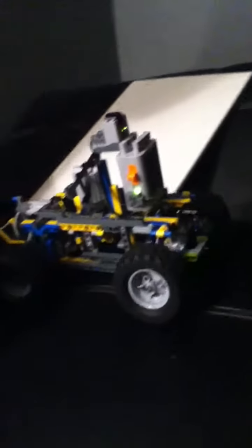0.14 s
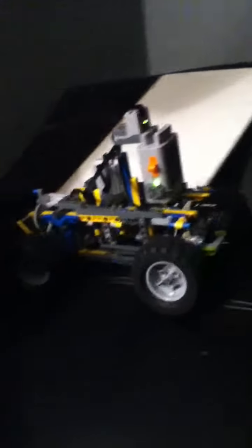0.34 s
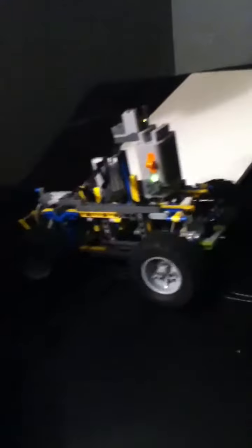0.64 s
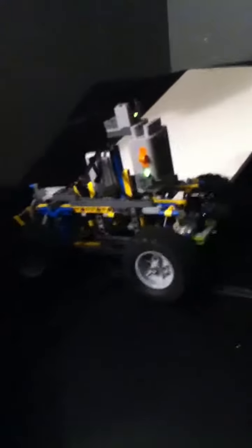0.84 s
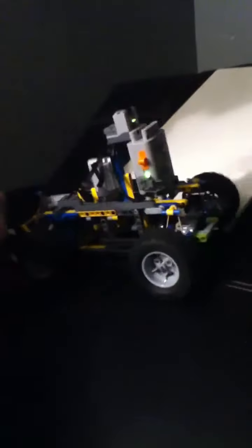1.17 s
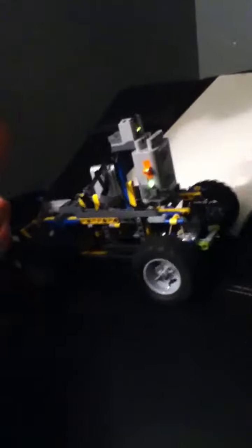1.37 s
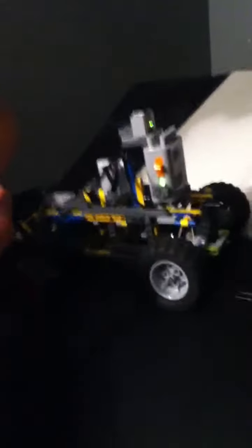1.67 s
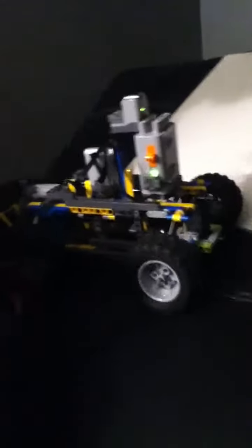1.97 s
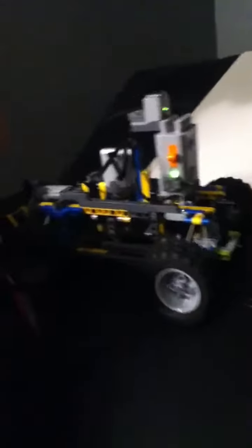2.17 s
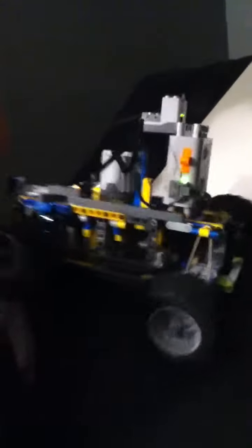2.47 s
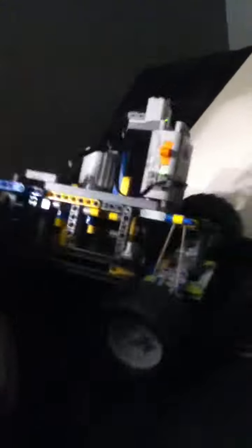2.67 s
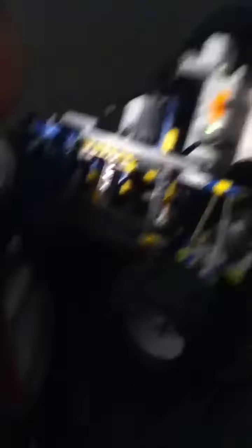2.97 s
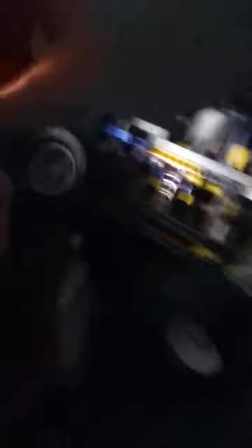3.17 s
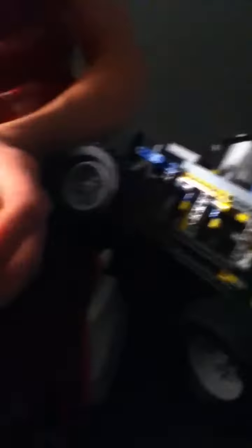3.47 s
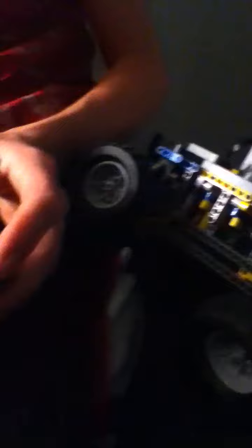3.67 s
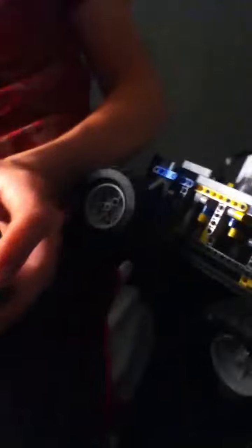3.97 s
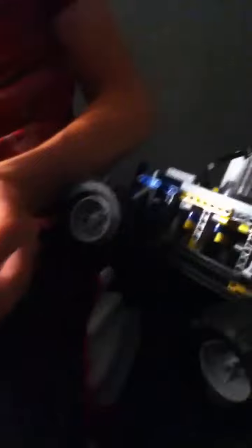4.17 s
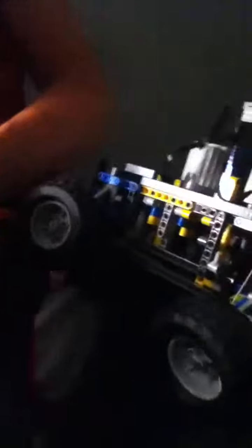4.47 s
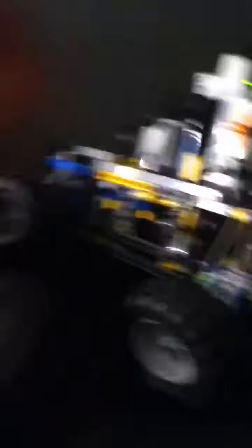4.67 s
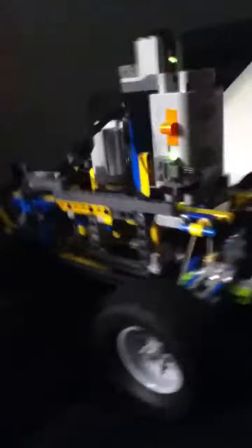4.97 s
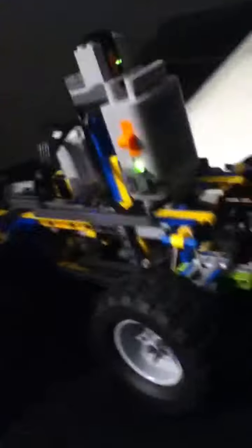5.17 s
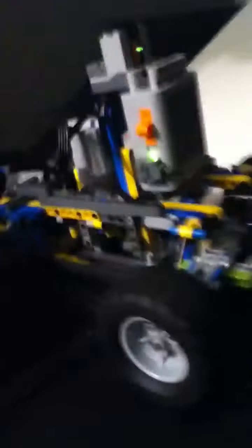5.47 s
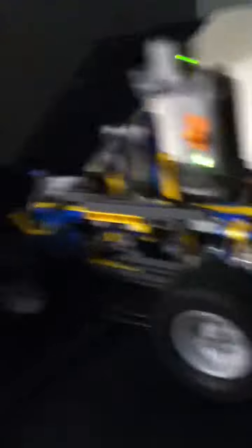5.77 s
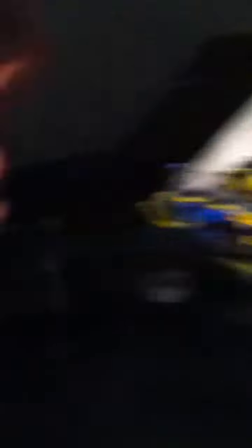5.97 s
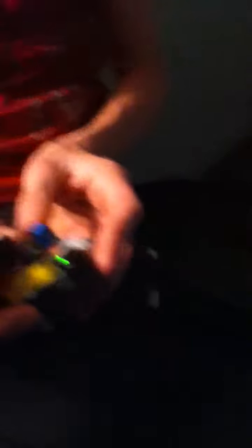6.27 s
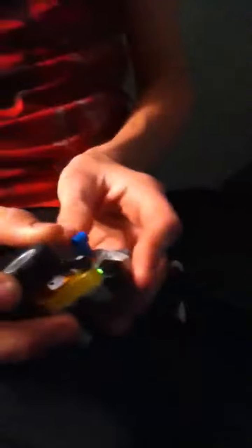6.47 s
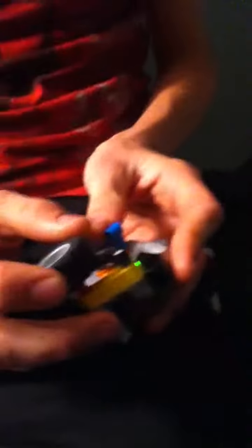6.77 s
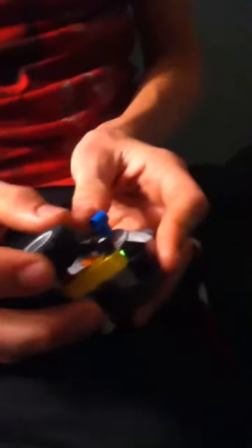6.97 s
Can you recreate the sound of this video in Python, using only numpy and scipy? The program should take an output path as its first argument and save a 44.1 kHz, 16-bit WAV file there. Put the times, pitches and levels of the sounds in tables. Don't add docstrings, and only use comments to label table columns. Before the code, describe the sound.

A small electric motor and plastic gears whirr and rattle in uneven bursts, stopping and restarting, with sharp plastic snaps in a quiet room.

```python
import sys
import numpy as np
from scipy import signal
from scipy.fft import rfft, irfft
from scipy.io import wavfile

SR = 44100
rng = np.random.default_rng(int(sys.argv[2]) if len(sys.argv) > 2 else 0)


def volts_from_decibels(level):
    exponent = np.asarray(level, float) / 20
    return 10 ** exponent


def dump_mix(stems):
    frames = np.atleast_2d(stems).T
    limited = np.clip(frames, -1, 1)
    pcm = np.round(limited * 32767).astype(np.int16)
    wavfile.write(sys.argv[1], SR, pcm)


N = 313992


def rms_one(x):
    return x / np.sqrt(np.mean(x ** 2) + 1e-20)


def in_time(rows):
    seconds, *columns = np.transpose(rows)
    return [np.interp(np.arange(N) / SR, seconds, column) for column in columns]


def drift(rate_hz):
    r = np.exp(-2 * np.pi * rate_hz / SR)
    wander = signal.lfilter([1], [1, -2 * r, r * r], rng.standard_normal(N + SR))
    return rms_one(wander[SR:])


def resonance(x, hz, width_hz):
    r = np.exp(-np.pi * width_hz / SR)
    poles = [1, -2 * r * np.cos(2 * np.pi * hz / SR), r * r]
    return signal.lfilter([(1 - r * r) / 2, 0, (r * r - 1) / 2], poles, x)


def swells(rows):
    t, swell_s = np.arange(N) / SR, 0.07
    gain = 0
    for start, end, db in rows:
        ramp = np.clip(np.minimum(t - start, end - t) / swell_s + 0.5, 0, 1)
        gain = gain + volts_from_decibels(db) * np.sin(np.pi / 2 * ramp) ** 2
    return gain


# time in seconds, teeth meshing per second in Hz.
SPEED = [
    [(.03, 1078), (.55, 1130), (.76, 1110), (.84, 1000), (.95, 930)],
    [(1.0, 907), (1.3, 1146), (1.5, 969), (1.62, 915)],
    [(1.92, 635), (2.0, 717), (2.1, 773), (2.4, 831), (2.5, 839), (2.6, 862), (2.8, 1008), (2.9, 967),
     (3.1, 913)],
    [(3.52, 810), (3.62, 845), (3.72, 910), (3.82, 948), (3.92, 922)],
    [(4.0, 965), (4.44, 1121), (4.69, 1005), (4.92, 992), (5.1, 1115), (5.21, 1146), (5.43, 1028),
     (5.76, 1030), (5.98, 1070)],
    [(6.09, 1058), (6.31, 1111), (6.54, 1116), (6.64, 1040), (6.72, 985), (6.86, 1020), (6.95, 1140),
     (7.1, 1090)],
]


def motor_speed():
    mesh_hz, = in_time(sum(SPEED, []))
    return mesh_hz


# on in seconds, off in seconds, spin-up in seconds, coast-down in dB per second, small gears in dB.
RUNS = [
    (-.3, 0.743, .05, 68, -0.5),
    (0.97, 1.611, 0.05, 270, 0),
    (1.885, 3.099, 0.081, 294, 2),
    (3.492, 3.84, 0.076, 152, 3),
    (3.96, 6.199, 0.019, 150, 0.5),
    (6.216, 6.682, 0.05, 200, -6),
    (6.724, 7.3, 0.029, 200, -3),
]
STILL_DB = -34


def running():
    t, drive, small = np.arange(N) / SR, volts_from_decibels(STILL_DB), 1e-9
    for on, off, spin_s, coast_db, small_db in RUNS:
        spin_up = 1 - np.exp(-np.maximum(t - on, 0) / spin_s)
        run = spin_up * volts_from_decibels(-coast_db * np.maximum(t - off, 0))
        drive = drive + run
        small = small + run * volts_from_decibels(small_db)
    return 20 * np.log10(drive), 20 * np.log10(small / drive + volts_from_decibels(STILL_DB))


def unevenness(teeth, mesh_hz):
    labour = np.clip((870 - mesh_hz) / 40, 0, 1)
    motor_db = 1.9 + 0.6 * labour
    gear_db = 1.2 + 1.9 * labour
    knock = np.exp(4 * (np.cos(2 * np.pi * teeth / 20 + 1.6 * drift(9)) - 1))
    motor_pulse_db = motor_db * np.cos(2 * np.pi * teeth / 8 + 0.4 * drift(5))
    gear_pulse_db = gear_db * knock * (1 + 0.7 * drift(20))
    return motor_pulse_db + gear_pulse_db + 0.51 * drift(28) + 0.31 * drift(260)


# from in seconds, to in seconds, level in dB.
SINGS = [
    [(.52, .72, -57), (1.06, 1.52, -58.5), (2.68, 3.04, -60.5), (4.06, 4.27, -57), (4.6, 6.2, -57.5),
     (6.76, 7.12, -63.5)],
    [(0, .68, -59), (1.3, 1.6, -55), (2.66, 3.0, -53), (4.65, 5.15, -50), (5.28, 6.14, -50.5),
     (6.4, 6.66, -56)],
    [(1.34, 1.56, -54.5), (2.3, 2.66, -48), (2.8, 3.06, -44), (3.56, 3.8, -48.5), (4.69, 4.93, -48),
     (5.17, 5.28, -62), (5.38, 5.85, -47.5), (6.9, 7.05, -49)],
    [(0, .5, -46.5), (1.39, 1.62, -43.5), (2.15, 3.04, -46), (4.7, 4.93, -48), (6.56, 6.74, -47)],
    [(.33, .77, -44.5), (1.27, 1.45, -50), (2.0, 2.6, -46.5), (5.17, 5.7, -55), (5.92, 6.04, -46)],
]
QUIET_MESH_DB = -69.5


def whine(teeth, force_db, drive_db):
    play = 0.7 * drift(28) + 0.15 * drift(200)
    play += 0.26 * np.sin(2 * np.pi * teeth / 8 + drift(4))
    turning = np.minimum(volts_from_decibels(1.5 * (drive_db + 14)), 1)
    tones = 0
    for k, rows in enumerate(SINGS, start=1):
        level = (swells(rows) + volts_from_decibels(QUIET_MESH_DB)) * volts_from_decibels(2.5 * drift(35))
        tones = tones + level * np.sin(2 * np.pi * k * teeth + np.sqrt(k) * play)
    return volts_from_decibels(4.5) * turning * rms_one(volts_from_decibels(0.38 * force_db)) * tones


# from in seconds, to in seconds, level in dB.
SECOND_PAIR = [
    (4.0, 4.42, -58.5),
    (4.55, 4.9, -57.5),
    (5.14, 6.2, -56.5),
]
# from in seconds, to in seconds, level in dB.
THIRD_PAIR = [
    (-.1, .15, -55.5),
    (.15, .48, -63),
    (4.17, 4.4, -58),
]


def slow_pair(teeth, flutter_db):
    second = np.sin(2 * np.pi * teeth * 0.6 + 0.8 * drift(20))
    second = swells(SECOND_PAIR) * volts_from_decibels(flutter_db * drift(25)) * second
    third = np.sin(2 * np.pi * teeth / 3 + 0.54 * drift(17))
    third = swells(THIRD_PAIR) * volts_from_decibels(flutter_db * drift(20)) * third
    return second + third


# time in seconds, nearness as rattle level in dB, motor side facing the listener in dB,
# wheel load on the chassis in dB.
POSE = [(0, -38, -5, 2), (.18, -40, -2, 2.5), (.31, -39, -5.5, 1), (.36, -39, 5, 2), (.72, -40, 1.5, 1),
        (1.08, -39, -2.5, 0), (1.36, -39, 2, -0.5), (1.5, -37, -3, -3), (2.03, -38.5, -5.5, -4),
        (3.05, -39, -0.5, 1), (3.75, -40, -2, 1.5), (4.0, -44, -3, 8.5), (4.7, -39, 2, 3.5),
        (6.16, -37, 1.5, 3), (6.29, -43.5, 3, 6), (6.66, -41.5, 5.5, -3), (6.86, -44.5, -2.5, 9.5),
        (6.95, -42.5, 9.5, 5)]
# level against nearness in dB, share of facing, share of load (both plain factors).
PARTS = [(-4.5, -0.054, 1.014), (-0.64, -0.25, .02), (-0.83, 0.43, -0.12), (-2, 0.73, 0.13)]


def heard_parts(drive_db, small_db):
    near_db, facing_db, load_db = in_time(POSE)
    levels = []
    for db, facing_share, load_share in PARTS:
        levels.append(drive_db + near_db + db + facing_share * facing_db + load_share * load_db)
    return levels[:-1] + [levels[-1] + small_db]


# pitch in Hz, width in Hz, level in dB.
CHASSIS = [(535, 320, -12.5), (1052, 260, -8), (1587, 456, -5), (2100, 470, -0.5), (2630, 430, -1.5),
           (3064, 280, -3.5), (7180, 560, -7)]
# pitch in Hz, width in Hz, level in dB.
BEAMS = [(3324, 560, -4.5), (3724, 357, 1.93), (3872, 295, 1.8), (4616, 590, -6.5)]
# pitch in Hz, width in Hz, level in dB.
HOUSING = [(5070, 370, -2), (5490, 440, 1.5), (6630, 1300, -5)]
# pitch in Hz, width in Hz, level in dB.
SMALL_GEARS = [(8180, 1070, -1.5), (9220, 1020, 2), (10950, 1030, -2), (12130, 3700, -12)]


def rattle(force_db, levels_db, per_s, spread_db, patchy_db):
    out = 0
    for part, level_db in zip((CHASSIS, BEAMS, HOUSING, SMALL_GEARS), levels_db):
        sizes = volts_from_decibels(spread_db * np.minimum(rng.exponential(1, N), 4.2)) * rng.choice([-1, 1], N)
        contacts = sizes * (rng.random(N) < per_s / SR) * volts_from_decibels(force_db)
        rings = 0
        for k, (hz, width_hz, db) in enumerate(part):
            ring = resonance(contacts, hz, width_hz)
            rings = rings + (-1) ** k * volts_from_decibels(db + patchy_db * drift(3.0)) * ring
        out = out + volts_from_decibels(level_db) * rms_one(rings)
    return out


# time in seconds, peak in dB, 1-2.5 kHz level in dB, 5-9 kHz level in dB, burst length in seconds.
SNAPS = [(2.7716, -15, -5.5, -7, 0.0012), (2.949, -11, -2, -17, 0.0023), (3.366, -27, -7, -1, 0.0011),
         (3.489, -44, -6, -3, .0012), (3.6557, -8, -17, -9, 0.00045), (3.658, -11.5, -10, 0, 0.0024),
         (3.815, -36, -12, 0.5, .0008), (3.968, -29.5, -15, -13, .0015), (6.0767, -2, -3.5, -11, 0.0012),
         (6.256, -30, -4, -8, 0.0015), (6.518, -20, -6, -4, 0.0025), (6.524, -23, -3, -5, .0008)]


def snaps():
    out, t = np.zeros(N + 2048), np.arange(2048) / SR
    band = signal.butter(2, [1100, 8500], "band", fs=SR, output="sos")
    for s, peak_db, low_db, high_db, length_s in SNAPS:
        burst = rng.standard_normal(2048) * np.exp(-t / max(length_s, 2e-4)) * 0.35
        burst[0] += 0.9
        middle = rms_one(resonance(burst, 4060, 500)) + 0.3 * rms_one(resonance(burst, 4060, 2500))
        low = resonance(burst, 2050, 330) + 0.28 * resonance(burst, 2700, 1300)
        high = resonance(burst, 6300, 1500)
        hit = middle + volts_from_decibels(low_db) * rms_one(low) + volts_from_decibels(high_db) * rms_one(high)
        hit = signal.sosfilt(band, hit)
        at = round(s * SR)
        out[at:at + 2048] += volts_from_decibels(peak_db) * hit / np.abs(hit).max()
    return out[:N]


# delay in seconds, level in dB.
ECHOES = [
    (.0017, -7),
    (.0043, -15),
    (.0127, -20),
    (.021, -24),
]


def walls(x):
    out, dull = x.copy(), signal.lfilter([0.6], [1, -0.4], x)
    for s, level_db in ECHOES:
        lag = round(s * SR)
        out[lag:] += volts_from_decibels(level_db) * dull[:-lag]
    return out


# time in seconds, peak in dB, pitch in Hz.
BUMPS = [
    (2.775, -37, 590),
    (3.039, -44, 268),
    (3.268, -35.5, 226),
    (4.35, -40, 456.4),
    (4.515, -35, 624),
    (4.592, -34.5, 607),
    (5.17, -36, 696),
    (5.431, -48, 200),
]


def bumps():
    out, t = np.zeros(N + 2048), np.arange(2048) / SR
    for s, peak_db, hz in BUMPS:
        at = round(s * SR)
        cycles = hz * (t + 0.0011 * (1 - np.exp(-t / 0.0002)))
        thud = np.sin(2 * np.pi * cycles) * np.exp(-t / 0.0025)
        out[at:at + 2048] -= volts_from_decibels(peak_db + 3.5) * thud
    return out[:N]


# from in seconds, to in seconds, level in dB.
DRAG = [
    (.53, .67, -52),
]


def drag():
    white = rng.standard_normal(N)
    rumble = resonance(white, 153, 40) + 0.65 * resonance(white, 230, 50) + 0.18 * resonance(white, 310, 90)
    return swells(DRAG) * rms_one(rumble)


def coloured(spectrum):
    hz, level_db = np.transpose(spectrum)
    grid = np.maximum(np.fft.rfftfreq(N, 1 / SR), 1)
    gain = volts_from_decibels(np.interp(np.log(grid), np.log(hz), level_db))
    return rms_one(irfft(rfft(rng.standard_normal(N)) * gain, N))


# frequency in Hz, level in dB per Hz.
ROOM = [(18, -50), (40, -11.5), (114, -3.5), (284, -5), (600, -15), (1000, -12), (1500, -17.5), (3000, -16),
        (4100, -10), (4700, -22.5), (8000, -20.5), (12000, -25), (15800, -31)]
ROOM_DB = -53
HUM_HZ, HUM_DB = 123.2, -66


def room():
    hum = volts_from_decibels(HUM_DB + 2.5 * drift(3.8)) * np.sin(2 * np.pi * HUM_HZ * np.arange(N) / SR)
    return volts_from_decibels(ROOM_DB + 2.0 * drift(4.8)) * coloured(ROOM) + hum


def scene():
    mesh_hz = motor_speed()
    teeth = np.cumsum(mesh_hz) / SR
    drive_db, small_db = running()
    force_db = unevenness(teeth, mesh_hz)
    tones = whine(teeth, force_db, drive_db) + slow_pair(teeth, flutter_db=4.0)
    levels_db = heard_parts(drive_db, small_db)
    gears = rattle(force_db, levels_db, per_s=14000.0, spread_db=2.5, patchy_db=1.1)
    return (tones + gears + walls(snaps()) + bumps() + drag() + room())[None]


def low_pass(x):
    return signal.sosfilt(signal.butter(12, 15780, fs=SR, output="sos"), x)


def record(dry):
    dry = 0.62 * np.tanh(dry / 0.62)
    heard = dry - 0.56 * resonance(dry, 13400, 560)
    heard = signal.sosfilt(signal.cheby2(10, 60, 17000, fs=SR, output="sos"), heard)
    return low_pass(heard)


dry = scene()
out = record(dry)
dump_mix(out)
```